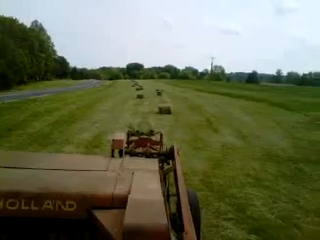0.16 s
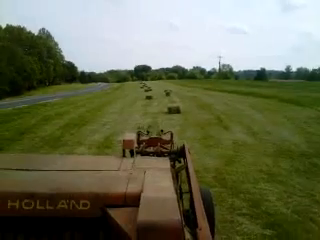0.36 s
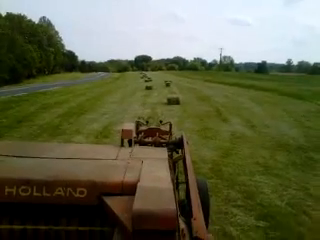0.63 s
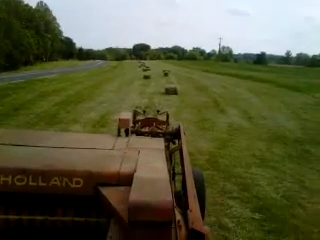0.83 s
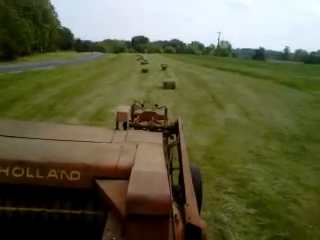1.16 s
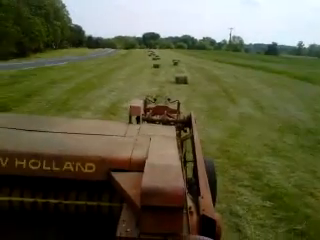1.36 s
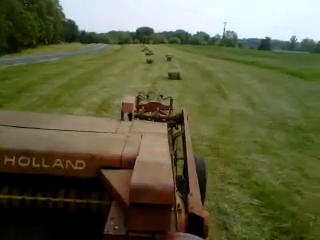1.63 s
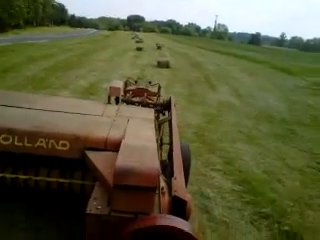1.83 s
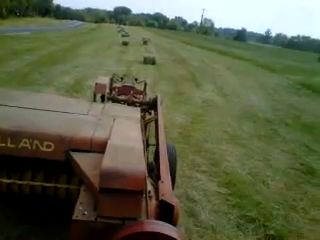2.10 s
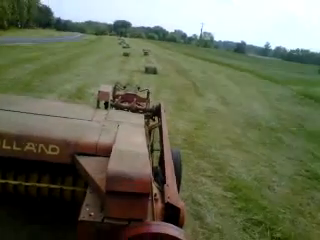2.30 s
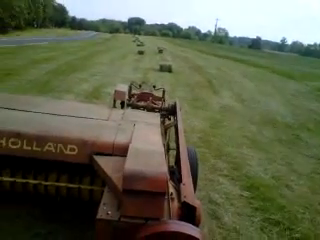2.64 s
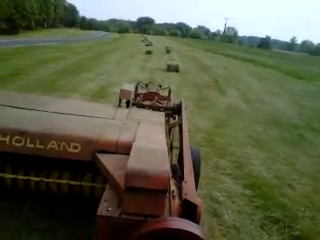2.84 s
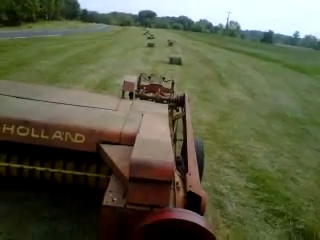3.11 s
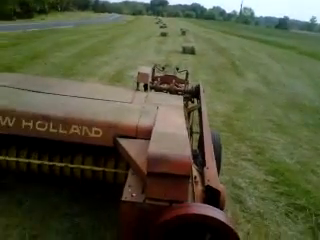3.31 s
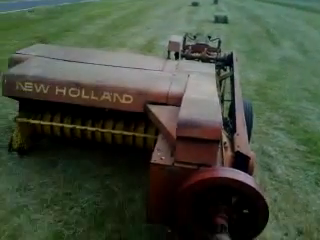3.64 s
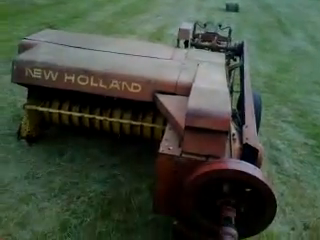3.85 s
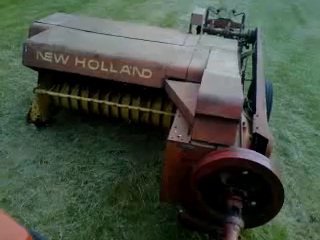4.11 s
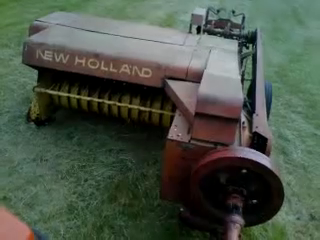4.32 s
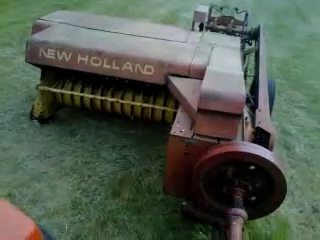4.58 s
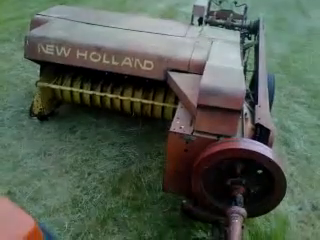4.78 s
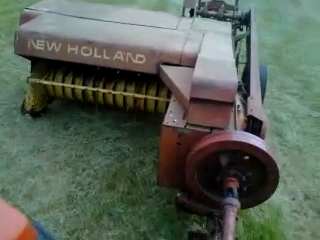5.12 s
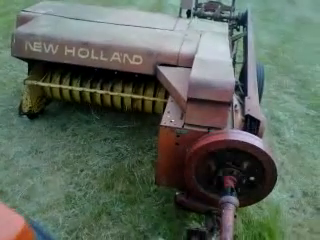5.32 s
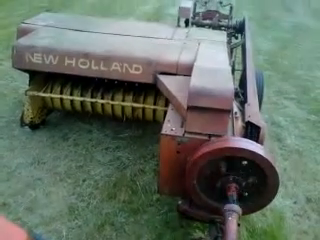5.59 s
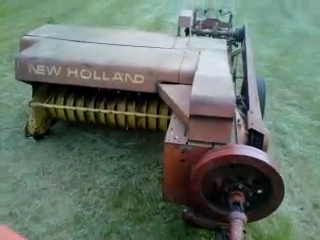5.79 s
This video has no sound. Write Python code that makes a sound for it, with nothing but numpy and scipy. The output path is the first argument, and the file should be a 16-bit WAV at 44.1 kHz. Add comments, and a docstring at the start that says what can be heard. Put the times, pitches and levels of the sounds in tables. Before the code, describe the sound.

Close tractor drone and rattling baler with rhythmic hay-packing strokes wind down to a low idle amid irregular metallic clanks and short squeals.

```python
"""A hay field, from the seat of a four-cylinder tractor towing a square baler, with both close by.
The exhaust drones at the firing rate, while chassis, feeder and chains are shaken by tiny impacts.
The plunger packs swishing hay twice a second; then the throttle closes and the engine runs down to idle.
The baler's flywheel overruns and its slack drive clanks and rings, as bursts of blows on panels and steel.
A small microphone with rounded peaks and no top treble gives two identical channels."""
import sys
import numpy as np
from scipy import signal
from scipy.fft import rfft, irfft
from scipy.io import wavfile
from scipy.ndimage import uniform_filter1d

SR = 44100
rng = np.random.default_rng(int(sys.argv[2]) if len(sys.argv) > 2 else 0)


def waveform_to_disk(signal):
    """Save audio, clipped to [-1, 1], as 16-bit WAV at the path in sys.argv[1]."""
    frames = np.transpose(np.atleast_2d(signal))
    scaled = np.clip(frames, -1, 1) * 32767
    samples = np.round(scaled).astype(np.int16)
    wavfile.write(sys.argv[1], SR, samples)


N = 262395
TIME = np.arange(N) / SR

# Table levels are those before the trims in each source and the microphone.
# engine speed: time_s, firing_rate_hz
ENGINE_SPEED = [(0, 68.13), (.5, 68.1), (1.0, 67.92), (1.45, 69), (2.3, 67.53), (2.75, 60.2), (3.45, 49.13),
                (4.0, 39.97), (4.4, 33.94), (5.1, 25.58), (5.4, 21.54), (5.65, 24.93), (5.95, 27.63)]
# pull on the drive: time_s, gear_load_db
DRIVE_LOAD = [(0, 2), (.7, 3), (1.8, 2), (2.4, 2), (3.2, -0.5), (3.65, -2.5), (4.7, -7), (5.95, -5)]
# exhaust resonances of pipe and bodywork: pitch_hz, width_hz, level_db
EXHAUST_RESONANCES = [(25.3, 2.5, -40.5), (40, 12, -38), (50.6, 5.6, -28.5), (60.5, 6.9, -32.5),
                      (67.6, 18, -34.5), (80, 11, -36), (97, 23, -31.5), (116, 20, -23.5), (127, 7.6, -25)]
# shaft and gear tones under load: multiple_of_firing_rate, level_db
GEAR_TONES = [(1.5, -49.5), (3, -45.5), (3.42, -40.5), (6.33, -46), (8.5, -45.5), (9.5, -43)]
# final drive whine: time_s, level_db
WHINE_LEVEL = [(0, -45.5), (1.9, -44), (2.7, -47.5), (3.05, -52), (3.2, -45), (3.42, -41.5), (3.6, -48),
               (5.95, -52.5)]

# steady running between strokes: time_s, chassis_rumble_db, feeder_clatter_db, chain_rattle_db
STEADY_RUNNING = [(0, -35, -38, -36), (2.1, -36.5, -32.5, -33.5), (2.8, -37.5, -40, -39),
                  (3.85, -40.5, -36, -35), (4.8, -38.5, -36.5, -34.5), (5.8, -43.5, -36, -38),
                  (5.92, -52, -47.5, -43)]
# plunger strokes, further apart as the flywheel slows:
# time_s, chassis_rumble_db, feeder_clatter_db, chain_rattle_db
PLUNGER_STROKES = [(.02, -38, -28, -30.5), (0.579, -31, -25.5, -32.5), (1.03, -30, -27.5, -33),
                   (1.531, -31.5, -25.5, -32.5), (1.99, -31.5, -27, -37), (2.539, -27.5, -26.5, -33.5),
                   (3.04, -35, -27.5, -34), (3.65, -38, -29.5, -30.5), (4.38, -34, -32, -34.5),
                   (5.3, -44.5, -36, -48)]
# wads of hay shoved along the chamber: shove_end_s, swish_db, build_s
HAY_WADS = [(.125, -35.5, 0.75), (.21, -44, 0.007), (0.595, -33.5, 0.13), (1.128, -31, 0.19),
            (1.602, -32.5, 0.14), (1.72, -37.5, 0.14), (1.9, -40.5, 0.015), (2.109, -34, 0.2),
            (2.592, -32.5, 0.17), (2.85, -43, 0.013), (3.17, -40, 0.25), (3.29, -45, 0.0062),
            (3.71, -40, 0.13), (3.94, -48, 0.37), (4.085, -50, .01), (4.165, -48.5, 0.018),
            (4.44, -42, 0.079), (4.68, -46.5, 0.02), (4.98, -55, 0.11), (5.23, -52.5, 0.008),
            (5.345, -49.5, 0.008), (5.5, -47.5, 0.0086), (5.65, -50, 0.02), (5.75, -55, 0.013)]

# clanks of the drive: start_s, casing_thud_db, panel_clang_db, linkage_ring_db, tine_rattle_db, chatter_s
DRIVE_CLANKS = [(0.046, -27, -29, -34, -42, 0.009), (0.166, -29, -30, -32, -34, .011),
                (0.336, -35.5, -30, -36, -40.5, 0.0068), (0.534, -30.5, -33, -43, -31, 0.0052),
                (1.087, -48, -31, -41, -37, 0.011), (1.294, -48, -28.5, -37, -44, 0.0033),
                (1.524, -22.5, -32, -45, -29, 0.0067), (1.688, -31.5, -33.5, -43, -36, 0.0085),
                (2.007, -25.5, -34, -36, -36, 0.0086), (2.089, -49, -30, -39, -30, 0.0072),
                (2.355, -30.5, -37, -47, -36.5, 0.023), (2.528, -22, -40.5, -51, -45, 0.012),
                (2.568, -28.5, -41, -48, -33, .0037), (2.925, -37.5, -34.5, -44, -33.5, 0.0063),
                (2.993, -17, -27, -39, -31.5, .007), (3.035, -24, -55, -50, -36.5, 0.0063),
                (3.385, -31, -29.5, -36, -35.5, .008), (3.472, -29.5, -35, -26.5, -38.5, .0075),
                (3.586, -30.5, -29, -26, -33, 0.0058), (3.646, -21, -37, -37, -34.5, 0.0097),
                (3.961, -34, -32, -35, -40, .0045), (4.022, -27.5, -27, -29, -32, 0.0099),
                (4.194, -28.5, -27, -39, -32, 0.008), (4.312, -30, -37.5, -28, -36.5, .015),
                (4.393, -29, -34, -32.5, -32, 0.022), (4.497, -29, -31.5, -30.5, -34, 0.0098),
                (4.542, -31, -34.5, -37, -34, 0.0065), (4.601, -33, -31, -27.5, -28.5, 0.01),
                (4.731, -35.5, -46.5, -35.5, -52, 0.014), (4.817, -32.5, -28, -31, -31, 0.0085),
                (4.857, -39, -40, -45.5, -35.5, 0.012), (4.926, -31.5, -35.5, -31, -39.5, 0.011),
                (5.038, -34, -32.5, -35, -35, 0.0072), (5.056, -28.5, -28.5, -32.5, -36.5, 0.0081),
                (5.159, -28.5, -26.5, -32, -38, 0.0064), (5.283, -24, -25.5, -26, -35, .0059),
                (5.313, -32.5, -35.5, -43, -38, .0065), (5.416, -27.5, -28, -27.5, -33.5, 0.0062),
                (5.556, -30, -29, -27.5, -40, 0.0066), (5.573, -28.5, -26.5, -28, -29.5, 0.0085),
                (5.709, -38, -37.5, -36, -40.5, 0.012), (5.843, -29.5, -29.5, -28.5, -38, 0.013)]
# hard blows on the drive shaft: start_s, level_db
DRIVE_SHAFT_BLOWS = [(4.61, -20.5), (4.819, -18), (5.572, -19)]
# edges scraping past each other within a clank: time_s, pitch_hz, level_db
EDGE_SCRAPES = [(.182, 2450, -44), (3.602, 4120, -29), (3.635, 2800, -52), (4.028, 3350, -31.5),
                (4.203, 1560, -33), (4.335, 1310, -41), (4.42, 1280, -30), (4.611, 2810, -26),
                (4.832, 3950, -26.5), (5.06, 2650, -34), (5.168, 3400, -37), (5.291, 2720, -30),
                (5.427, 2780, -34.5), (5.58, 2560, -38), (5.735, 1550, -38), (5.857, 2500, -32),
                (5.872, 1330, -29.5)]
# squeals and groans of dry parts as the machine slows to idle:
# start_s, length_s, pitch_hz, tone_db, octave_db
DRY_RUBS = [(3.86, .13, 1862, -40, -47), (4.34, .22, 1862, -37, -39), (4.56, .18, 1862, -45, -37),
            (5.05, .08, 391, -36, -60), (5.125, .06, 391, -28, -55), (5.27, .29, 391, -30, -55),
            (5.647, .135, 393, -28, -55)]
# jolts thumping in the frame and sheet metal: time_s, pitch_hz, level_db
FRAME_JOLTS = [(1.355, 58, -28.5), (1.81, 205, -30), (2.025, 825, -36), (2.44, 235, -28.5),
               (2.45, 130, -29), (2.55, 795, -27), (3.43, 200, -37), (3.9, 210, -38), (4.01, 135, -37),
               (4.17, 230, -33.5), (4.29, 220, -35), (4.58, 210, -35.5), (4.86, 55, -32),
               (5.17, 492, -32.5), (5.295, 479, -33), (5.415, 125, -33.5), (5.435, 249.4, -35.5),
               (5.83, 135, -37)]

# colour of the chassis rumble: pitch_hz, gain_db
CHASSIS_COLOUR = [(20, -13), (35, -5), (60, -2.5), (85, -0.5), (120, 0.5), (165, -1), (230, 3.5),
                  (310, -0.5), (450, -12.5), (900, -13.5), (2000, -54.5)]
# colour of the feeder clatter: pitch_hz, gain_db
FEEDER_COLOUR = [(150, -10.5), (330, -0.5), (490, 10), (660, 5.5), (860, 4.5), (1100, -3), (1350, -1.5),
                 (2000, -16), (4000, -99)]
# colour of the chain rattle: pitch_hz, gain_db
CHAIN_COLOUR = [(400, -14.5), (900, 5), (1300, 11), (1700, 10.5), (2100, 10.5), (2750, 10), (3100, 5),
                (4300, 3.5), (5200, -33.5), (7500, -41)]
# colour of the dry stalks: pitch_hz, gain_db
HAY_COLOUR = [(800, -3.5), (2000, 3.5), (2600, 2.5), (3200, -8), (3900, 3), (4300, 10), (4900, 5.5),
              (6000, 5), (7200, -5)]
# colour of the sheet metal panels: pitch_hz, gain_db
PANEL_COLOUR = [(700, -20.5), (1150, -29), (1400, 0), (2000, -1.5), (2600, 6.5), (3100, -7), (3600, -11),
                (5000, -33.5)]
# colour of the casing under a blow: pitch_hz, gain_db
CASING_COLOUR = [(120, -8.5), (250, -6), (480, 5), (650, -3.5), (850, 1.5), (1100, -2), (1600, -19.5)]
# colour of the tine rattle: pitch_hz, gain_db
RATTLE_COLOUR = [(2400, -15.5), (3200, -2.5), (3800, -15), (4000, 0), (4500, 6), (5200, 0.5), (6300, -0.5),
                 (7200, -11.5)]
# ringing steel of the linkage: pitch_hz, level_db, t60_s
LINKAGE_MODES = [(1255, -11, .12), (1315, -4, .15), (1540, -13, .07), (1735, -14, .14), (1862, -11, .2),
                 (2094, -3.5, .13), (2150, -6, .07), (2340, -9, .06)]
# ringing steel of the pickup tines: pitch_hz, level_db, t60_s
TINE_MODES = [(3690, -8, .07), (3730, -2, .14), (3790, -6, .08), (3912, -4, .14), (4010, -9, .07),
              (4124, -4, .12), (4290, -10, .06), (4427, -3, .15), (4490, -7, .04), (4640, -11, .03),
              (4830, -11, .03), (5219, -14, .06)]

WORKING_HZ = 68  # firing rate at working speed
EXHAUST_FLOOR_DB, EXHAUST_DB_PER_OCTAVE = -44, 2  # between resonances; gain as the speed doubles
OCTAVE_DB = -3.5  # the octave against the firing tone
STROKE_BUILD_S, STROKE_RELEASE_S = 0.32, 0.093
WAD_HOLD_S, WAD_RELEASE_S = 0.035, 0.025
STALKS_DB = -69  # loose stalks at working speed, before the hay trim
SHIFT_DB, SHIFT_RATE = 4.4, 9  # limit of each band's swing; random steps per second
# small parts thrown about in a clank: blows per second, range of pitch, ring, level against the panels
BOUNCE_RATE, BOUNCE_LOW_HZ, BOUNCE_HIGH_HZ, BOUNCE_T60_S, BOUNCE_DB = 500, 1250, 3200, 0.04, -4
# bolts and links: blows per second, range of pitch, ring, level against the chain setting
TICK_RATE, TICK_LOW_HZ, TICK_HIGH_HZ, TICK_T60_S, TICK_DB = 80, 1382, 3057, 0.058, -9.5
SHAFT_HZ, SHAFT_SMEAR_HZ, SHAFT_T60_S = 2120, 29.2, 0.13
SCRAPE_BUILD_S, SCRAPE_RELEASE_S, SCRAPE_SMEAR_HZ = 0.0085, 0.017, 115
CLUMP_DB, CLUMP_RATE = 34, 47  # limit of the jangle's swing; random steps per second
GROAN_FADE_S = 0.04
JOLT_S, JOLT_SMEAR_HZ = 0.026, 15
TOP_HZ = 7350  # microphone cutoff


def engine(phase, firing_hz, load_db):
    """The exhaust drones at the firing rate and its octave; gears hum in step while they carry load."""
    firing = exhaust(firing_hz) * undb(0.4 * walk(13)) * np.sin(phase)
    octave = exhaust(2 * firing_hz) * undb(OCTAVE_DB + 1.1 * walk(26)) * np.sin(2 * phase)
    speed_db = EXHAUST_DB_PER_OCTAVE * np.log2(firing_hz / WORKING_HZ)
    drone = (firing + octave) * undb(speed_db)
    gears = 0
    for multiple, db in GEAR_TONES:
        level = undb(db + 4.0 * np.tanh(walk(8)) - 0.5)
        unsteadiness = 0.07 * np.sqrt(multiple) * walk(12)
        gears = gears + level * np.sin(multiple * phase + unsteadiness)
    return np.sqrt(2) * (undb(-3.5) * drone + undb(2.0 * load_db - 4.0) * gears)


def exhaust(tone_hz):
    """Gain of an exhaust tone: it booms whenever it meets a resonance of pipe or bodywork."""
    power = undb(EXHAUST_FLOOR_DB) ** 2
    for hz, width_hz, db in EXHAUST_RESONANCES:
        power = power + (undb(db) / (1 + (2 * (tone_hz - hz) / width_hz) ** 4)) ** 2
    return np.sqrt(power)


def whine(phase, teeth=19):
    """The teeth of the final drive sing unsteadily, loudest as the baler pushes the tractor."""
    backlash = 0.9 * walk(40) + 0.7 * walk(200)
    level = undb(curves(WHINE_LEVEL)[0] + 3.5 + 2.0 * walk(25))
    return level * np.sin(teeth * phase + backlash)


def machinery(phase, rumble_db, feeder_db, chain_db, free):
    """Each firing shakes the chassis; the feeder clatters and the chains rattle against the linkage."""
    shake = 1 + 0.049 * np.cos(phase)
    rumble = unit(colour(impacts(4000, 2.4) * shake, CHASSIS_COLOUR))
    feeder_blows = impacts(2500, 2.0) * shake * undb(0.95 * walk(35))
    feeder = unit(colour(feeder_blows, FEEDER_COLOUR))
    links = impacts(4500, 0.84) * shake * undb(1.55 * walk(55))  # in clumps
    rattle = shifting(colour(links, CHAIN_COLOUR))
    ringing = free * undb(-5.5) * unit(ring(links, LINKAGE_MODES, 4.0))
    chains = rattle + ringing
    return undb(rumble_db + 1.0) * rumble + undb(feeder_db - 2.5) * feeder + undb(chain_db - 3.0) * chains


def effort():
    """Rumble, clatter and rattle levels in dB: steady running and a swell at each plunger stroke."""
    power = undb(curves(STEADY_RUNNING)) ** 2
    for s, *part_db in PLUNGER_STROKES:
        stroke = swell(s, STROKE_BUILD_S, STROKE_RELEASE_S)
        power = power + (undb(part_db)[:, None] * stroke) ** 2
    return 10 * np.log10(power)


def hay(firing_hz):
    """Dry stalks crackle and slide along the chamber, a wad at a time."""
    power = (undb(STALKS_DB) * firing_hz / WORKING_HZ) ** 2  # loose stalks
    for s, db, build_s in HAY_WADS:
        power = power + (undb(db) * swell(s, build_s, WAD_RELEASE_S, WAD_HOLD_S)) ** 2
    stalks = impacts(7000, 2.6) * undb(2.67 * walk(110))
    return undb(4.0) * np.sqrt(power) * unit(colour(stalks, HAY_COLOUR))


def clanks(free, loose_db=-13.5, loose_s=0.013, rise=0.68, fall=2.6):
    """Bursts of bounces thud in the casing, clang in the panels and ring the linkage and pickup tines."""
    force = np.zeros((4, N))
    for s, *part_db, chatter_s in DRIVE_CLANKS:
        rise_s, fall_s = max(rise * chatter_s, 0.002), max(fall * chatter_s, 0.006)
        since = TIME - s - rise_s
        # the bounces start hard and die away more slowly
        blow = np.exp(-np.minimum((since / np.where(since < 0, rise_s, fall_s)) ** 2, 20))
        # loose parts already chatter as the slack closes, and settle afterwards
        settle_s = np.where(since < 0, loose_s / 2, 2 * loose_s)
        loose = undb(loose_db) * np.exp(-np.minimum(np.abs(since) / settle_s, 20))
        force += undb(part_db)[:, None] * (blow + loose)
    ragged = undb(0.64 * walk(160))  # shared by all parts
    # each part also has bounces of its own
    thud, clang, knock, tink = (f * ragged * undb(0.51 * walk(100)) * impacts(3500, 0.62) for f in force)
    casing = undb(9.5) * colour(thud, CASING_COLOUR)
    panels = undb(3.5) * colour(clang, PANEL_COLOUR)
    linkage = undb(-3.5) * free * ring(knock, LINKAGE_MODES, 3.2)
    tine_rattle = undb(4.0) * colour(tink, RATTLE_COLOUR)
    tine_ring = undb(-5.5) * free * ring(tink, TINE_MODES, 6.6)
    bounces = pings(undb(BOUNCE_DB) * force[1], BOUNCE_RATE, BOUNCE_LOW_HZ, BOUNCE_HIGH_HZ, BOUNCE_T60_S)
    return casing + panels + linkage + tine_rattle + tine_ring + bounces


def shaft():
    """Hard blows make the drive shaft ring out and decay."""
    envelope = 0
    for s, db in DRIVE_SHAFT_BLOWS:
        attack = np.clip((TIME - s) / 0.004, 0, 1)
        decay = np.exp(-np.log(1000) * np.maximum(TIME - s, 0) / SHAFT_T60_S)
        envelope = envelope + undb(db) * attack * decay
    return envelope * buzz(SHAFT_HZ, SHAFT_SMEAR_HZ, 3.2)


def scrapes():
    """Edges rasp briefly, each at a pitch of its own."""
    rasps = 0
    for s, hz, db in EDGE_SCRAPES:
        envelope = undb(db) * swell(s, SCRAPE_BUILD_S, SCRAPE_RELEASE_S)
        rasps = rasps + envelope * buzz(hz, SCRAPE_SMEAR_HZ, 5.5)
    return rasps


def ticks(chain_db):
    """Loose bolts and links tick along with the chains."""
    return pings(undb(chain_db + TICK_DB), TICK_RATE, TICK_LOW_HZ, TICK_HIGH_HZ, TICK_T60_S)


def groan():
    """Dry parts squeal and groan unsteadily as the machine slows to idle."""
    rubs = 0
    for s, length_s, hz, db, octave_db in DRY_RUBS:
        gate = np.clip(np.minimum(TIME - s, s + length_s - TIME) / GROAN_FADE_S + 0.5, 0, 1)
        turn = 2 * np.pi * hz * TIME + 0.45 * walk(30) + 0.25 * walk(140)
        rubs = rubs + gate * (undb(db) * np.sin(turn) + undb(octave_db) * np.sin(2 * turn))
    return rubs * undb(-3.2 + 2.0 * walk(40))


def jangle(load_db, chain_db, db=-8):
    """As the load comes off, loose guards and tines jangle along with the chains in short clumps."""
    slack = 1 - np.minimum(undb(load_db), 1)
    taps = unit(impacts(6500, 1.4) * undb(CLUMP_DB * np.tanh(walk(CLUMP_RATE))))
    rattle = unit(colour(taps, RATTLE_COLOUR))
    guards = unit(colour(taps, PANEL_COLOUR))
    tines = undb(2.0) * unit(ring(taps, TINE_MODES, 4.0))
    return slack * undb(db + chain_db) * (rattle + guards + tines)


def jolts():
    """The uneven field shakes the machine; each jolt thumps at the pitch of the part it hits."""
    thumps = 0
    for s, hz, db in FRAME_JOLTS:
        envelope = undb(db) * np.exp(-np.minimum(((TIME - s) / JOLT_S) ** 2, 20))
        thumps = thumps + envelope * buzz(hz, JOLT_SMEAR_HZ, 2.2)
    return thumps


def boom(hz=128, width_hz=30, db=-45):
    """The mudguards boom as the wheels roll over the stubble: noise through two equal resonances."""
    b, a = signal.iirpeak(hz, hz / width_hz, fs=SR)
    once = signal.lfilter(b, a, rng.standard_normal(N))
    return undb(db) * unit(signal.lfilter(b, a, once))


def ring(force, modes, wander_db, smear_hz=9, rough_db=6.0):
    """Steel modes store a changing share of the blows' energy and let it out in a broken buzz."""
    out = 0
    for hz, db, t60_s in modes:
        keep = np.exp(-2 * np.log(1000) / (t60_s * SR))  # energy kept from sample to sample
        push = force * undb(db + wander_db * np.tanh(walk(12)))
        energy = signal.lfilter([1 - keep], [1, -keep], push ** 2)
        out = out + 2 * np.sqrt(energy) * buzz(hz, smear_hz, rough_db)
    return out


def pings(strength, rate, low_hz, high_hz, t60_s):
    """Small steel parts strike at random, as hard as they are shaken; each rings at its own pitch."""
    out, t = np.zeros(N), TIME[:SR // 20]
    decay = np.log(1000) / t60_s
    for when, pitch, size in rng.random((int(rate * N / SR), 3)):
        i = int(when * (N - len(t)))
        hz = low_hz * (high_hz / low_hz) ** pitch
        out[i:i + len(t)] += strength[i] * size * np.sin(2 * np.pi * hz * t) * np.exp(-decay * t)
    return out * np.sqrt(12 * decay / rate)  # evens out level against rate and ring time


def buzz(hz, smear_hz, rough_db):
    """A tone of rms near 1 whose part chatters against its neighbour: phase and level jump about."""
    drift = np.cumsum(rng.standard_normal(N)) * np.sqrt(2 * np.pi * abs(smear_hz) / SR)
    level = unit(undb(rough_db * np.tanh(walk(170))))
    return np.sqrt(2) * level * np.sin(2 * np.pi * hz * TIME + drift)


def shifting(x, count=14):
    """The colour keeps changing: each band of the midrange swells and sinks on its own."""
    log_hz = np.log(np.fft.rfftfreq(N, 1 / SR) + 1)
    place = np.interp(log_hz, np.log([400, 6500]), [0, count - 1])
    spectrum, out = rfft(x), 0
    for k in range(count):
        band = irfft(spectrum * np.maximum(1 - np.abs(place - k), 0), N)
        out = out + band * undb(SHIFT_DB * np.tanh(walk(SHIFT_RATE)))
    return unit(out)


def impacts(rate, scatter_db):
    """Tiny blows at random moments, rate per second and of uneven size, scaled to an rms of 1."""
    struck = rng.random(N) < rate / SR
    size = undb(scatter_db * rng.standard_normal(N))
    return unit(struck * rng.choice([-1, 1], N) * size)


def swell(s, build_s, release_s, hold_s=0):
    """An envelope that builds up, holds until the time s and breaks off."""
    early, late = np.maximum(s - hold_s - TIME, 0), np.maximum(TIME - s, 0)
    return np.exp(-np.minimum(early / build_s + (late / release_s) ** 2, 20))


def walk(rate):
    """Smoothed random steps, rate per second, scaled to an rms of 1."""
    k = int(SR / rate)
    steps = np.repeat(rng.standard_normal(N // k + 1), k)
    return unit(uniform_filter1d(steps, k)[:N])


def colour(x, points):
    """Filter by a spectrum of pitch_hz, gain_db points, joined along log frequency."""
    hz, db = np.transpose(points)
    f = np.maximum(np.fft.rfftfreq(len(x), 1 / SR), 1)
    return irfft(rfft(x) * undb(np.interp(np.log(f), np.log(hz), db)), len(x))


def curves(table):
    """The columns of a table, joined by straight lines in time."""
    s, *columns = np.transpose(table)
    return [np.interp(TIME, s, c) for c in columns]


def unit(x):
    """Scale to an rms of 1."""
    return x / np.sqrt(np.mean(x ** 2))


def undb(db):
    """Decibels to gain."""
    return 10 ** (np.asarray(db) / 20)


def scene():
    """Tractor and baler, close by in the open air, the same in both channels."""
    firing_hz, load_db = curves(ENGINE_SPEED)[0], curves(DRIVE_LOAD)[0]
    rumble_db, feeder_db, chain_db = effort()
    phase = 2 * np.pi * np.cumsum(firing_hz) / SR
    # steel held taut and packed with hay is damped; it rings more freely as the load comes off
    free = 1 - 0.69 * np.minimum(undb(load_db), 1)
    tractor = engine(phase, firing_hz, load_db) + whine(phase) + boom()
    baler = machinery(phase, rumble_db, feeder_db, chain_db, free) + hay(firing_hz)
    baler += clanks(free) + shaft() + scrapes() + ticks(chain_db)
    baler += groan() + jangle(load_db, chain_db) + jolts()
    return np.array([tractor + baler] * 2)


def record(dry):
    """A small microphone channel turns down the loudest blows, rounds the peaks and cuts the top."""
    envelope = np.sqrt(uniform_filter1d(dry[0] ** 2, int(0.019 * SR)) + 1e-12)
    limited = dry / (1 + (envelope / 0.13) ** 4) ** (1 / 4)
    rounded = np.tanh(3.4 * limited) / 3.4
    lowpass = signal.ellip(10, 0.2, 80, TOP_HZ, fs=SR, output="sos")
    return signal.sosfilt(lowpass, undb(0.5) * rounded)


dry = scene()
out = record(dry)
waveform_to_disk(out)
```